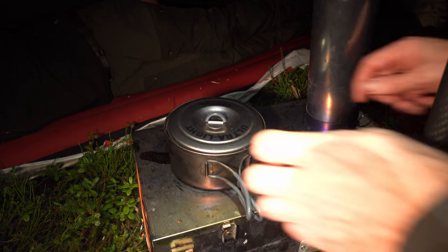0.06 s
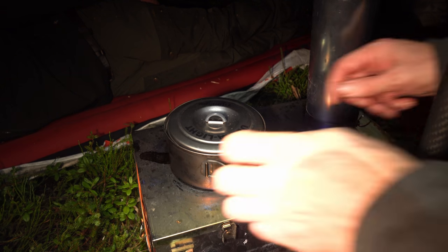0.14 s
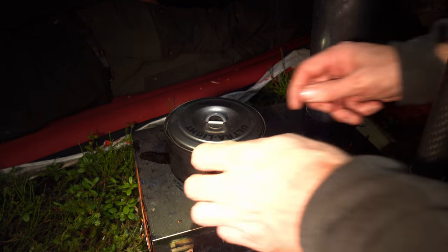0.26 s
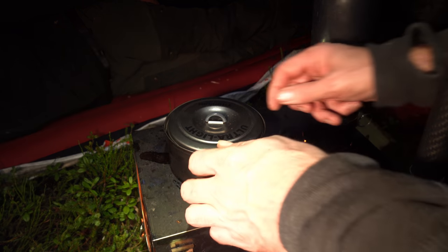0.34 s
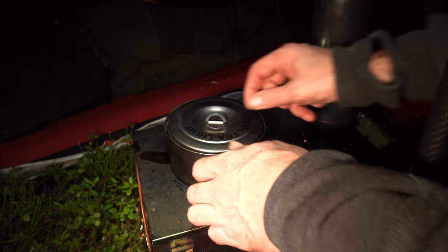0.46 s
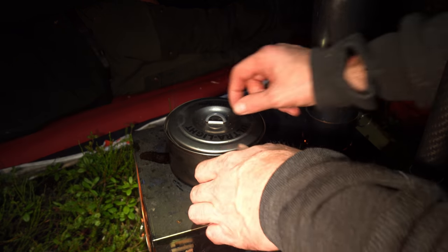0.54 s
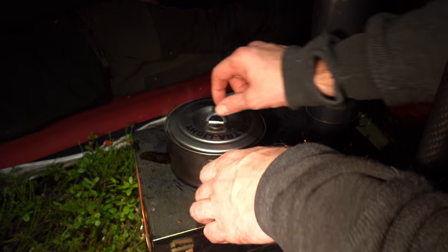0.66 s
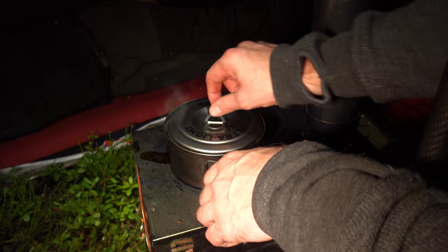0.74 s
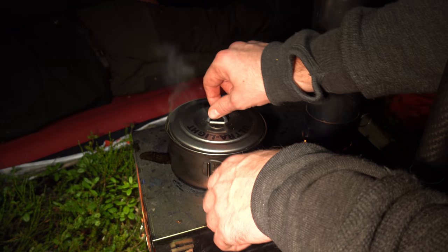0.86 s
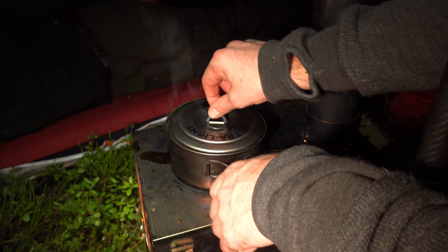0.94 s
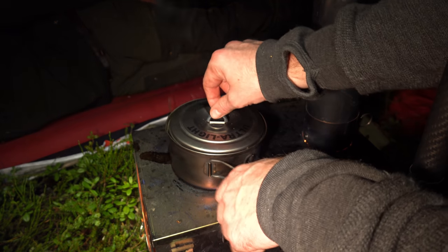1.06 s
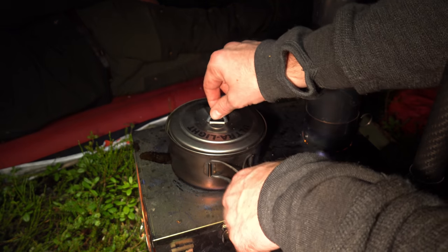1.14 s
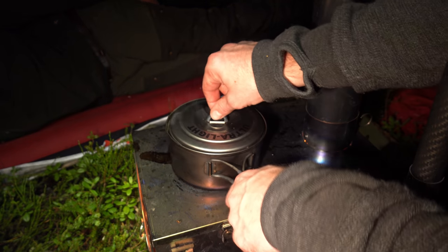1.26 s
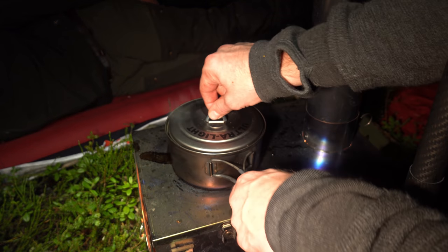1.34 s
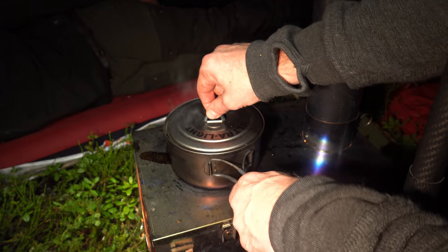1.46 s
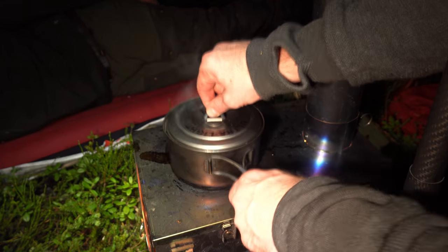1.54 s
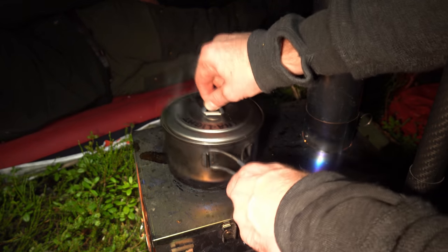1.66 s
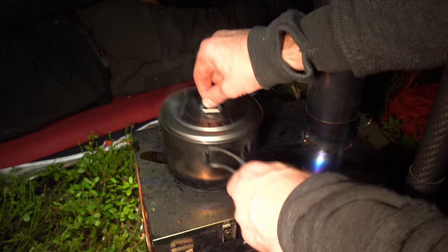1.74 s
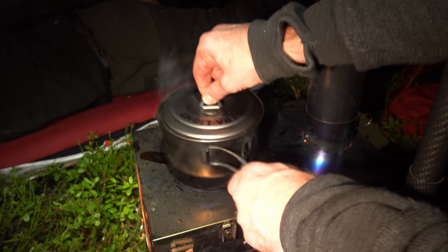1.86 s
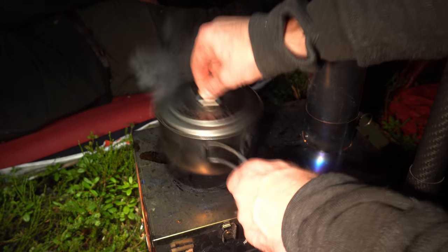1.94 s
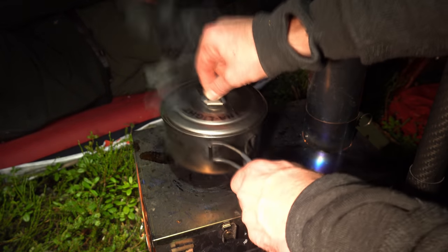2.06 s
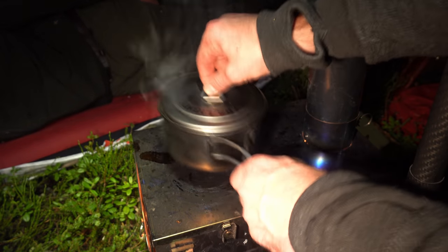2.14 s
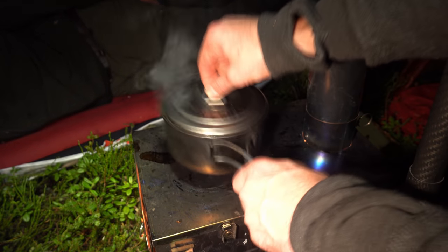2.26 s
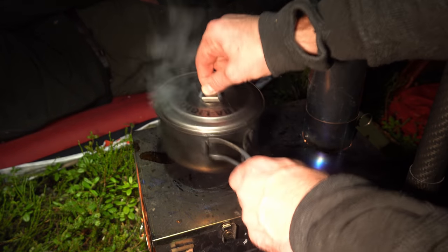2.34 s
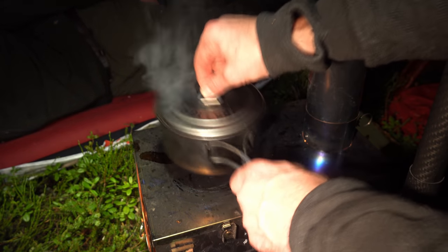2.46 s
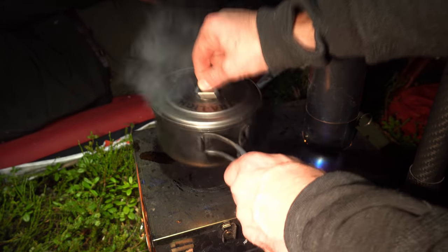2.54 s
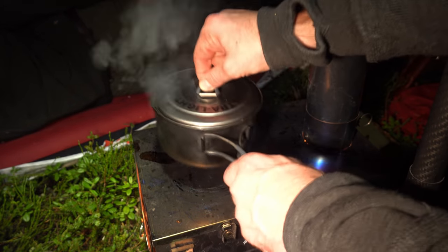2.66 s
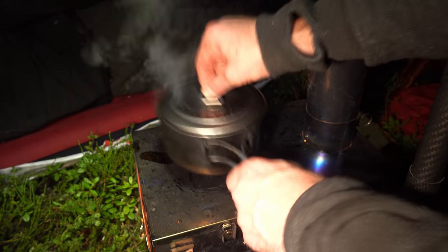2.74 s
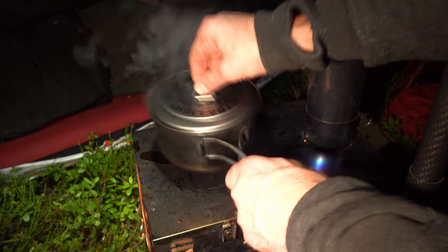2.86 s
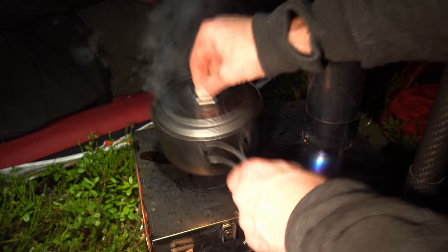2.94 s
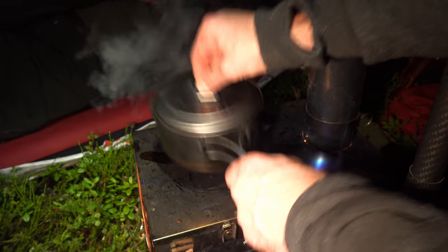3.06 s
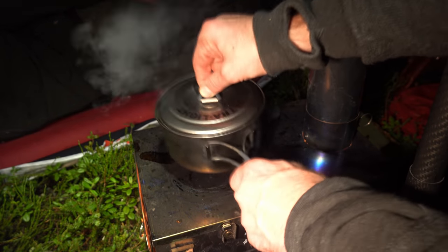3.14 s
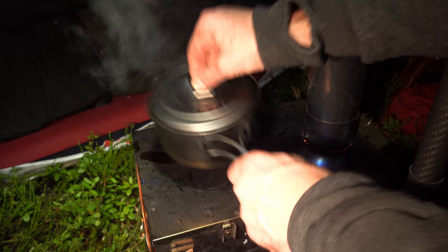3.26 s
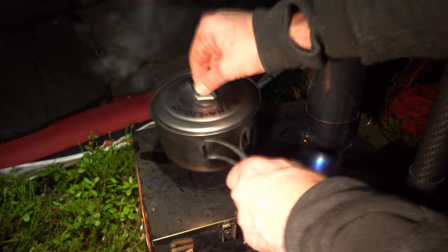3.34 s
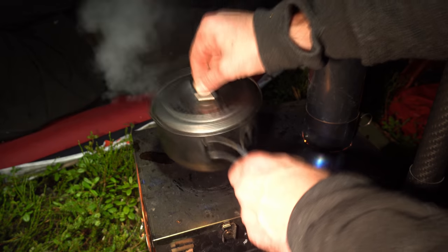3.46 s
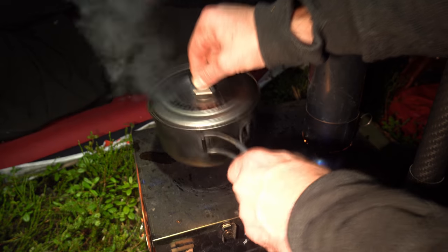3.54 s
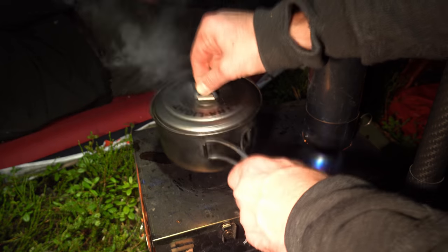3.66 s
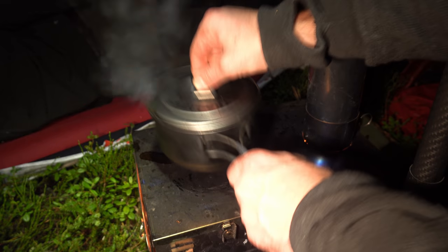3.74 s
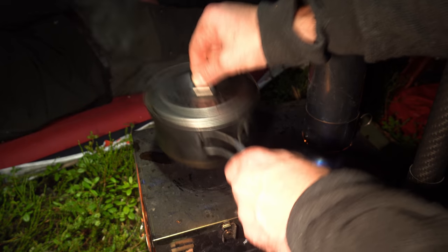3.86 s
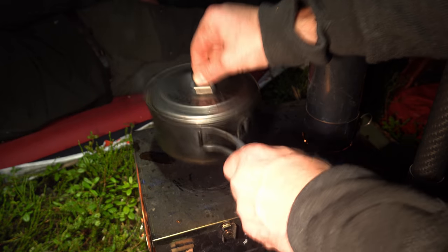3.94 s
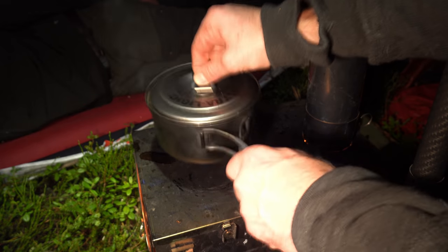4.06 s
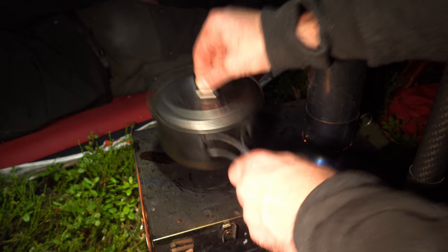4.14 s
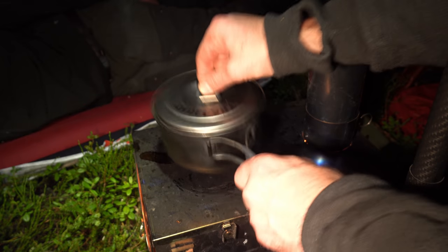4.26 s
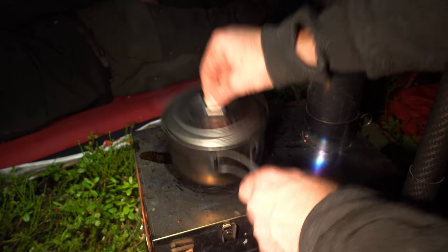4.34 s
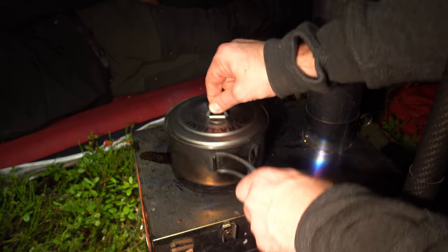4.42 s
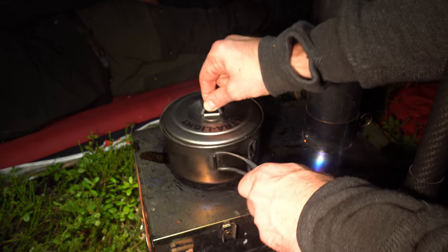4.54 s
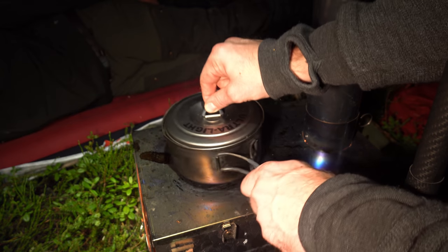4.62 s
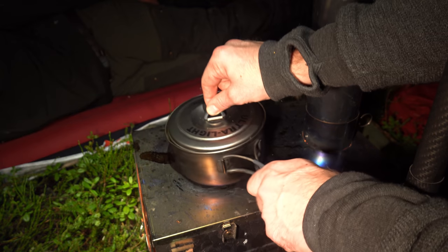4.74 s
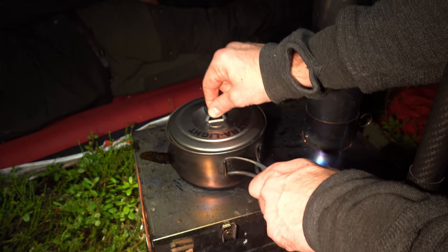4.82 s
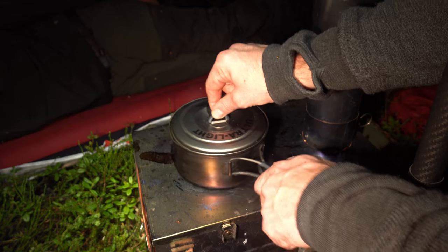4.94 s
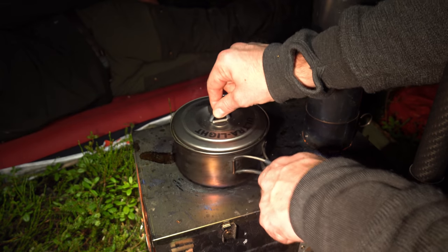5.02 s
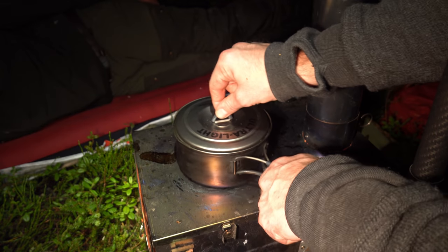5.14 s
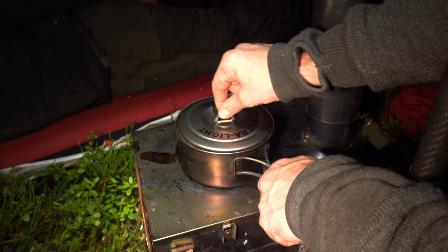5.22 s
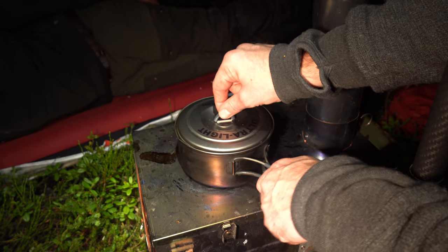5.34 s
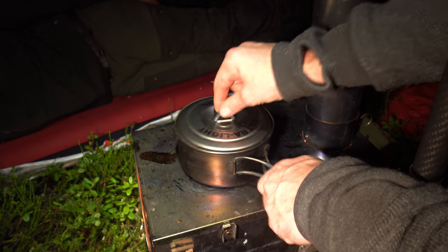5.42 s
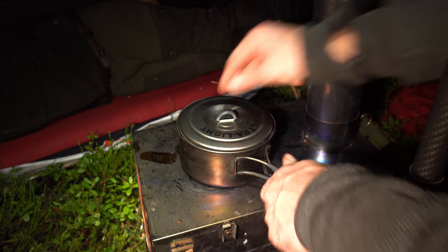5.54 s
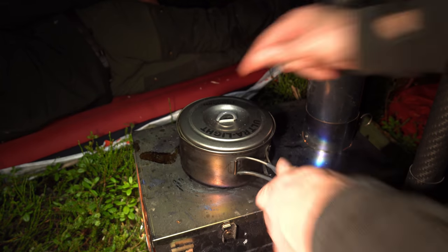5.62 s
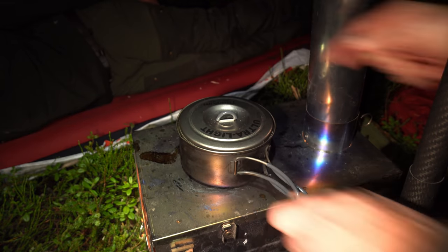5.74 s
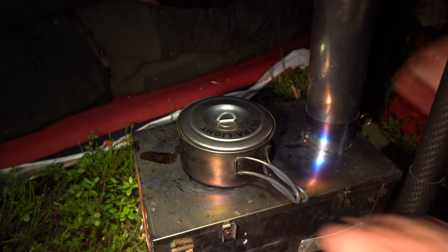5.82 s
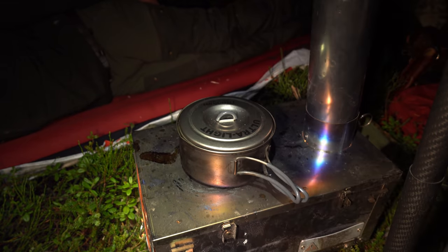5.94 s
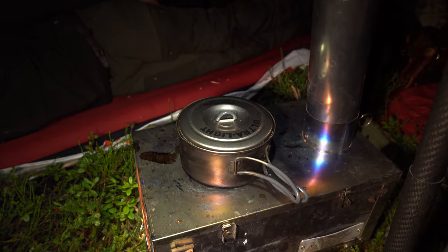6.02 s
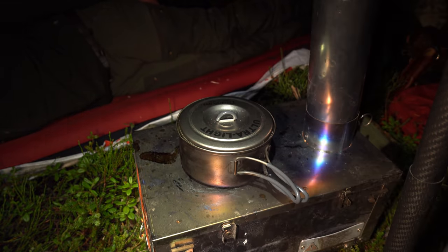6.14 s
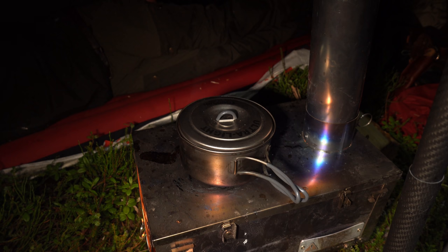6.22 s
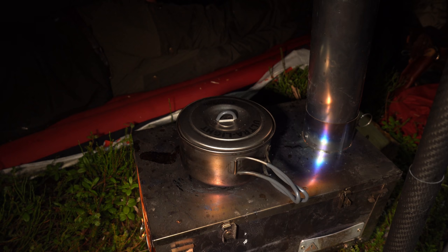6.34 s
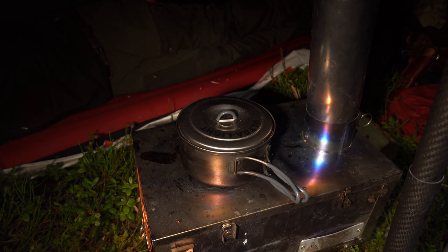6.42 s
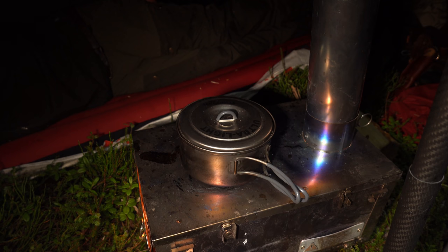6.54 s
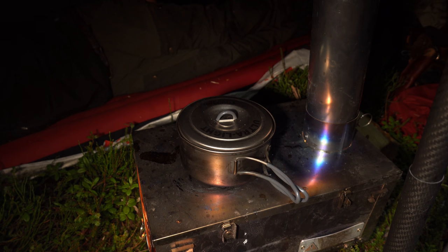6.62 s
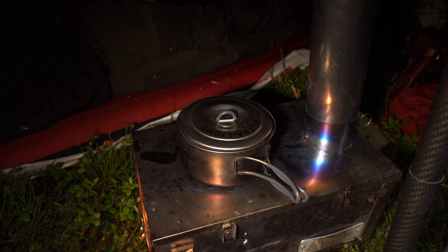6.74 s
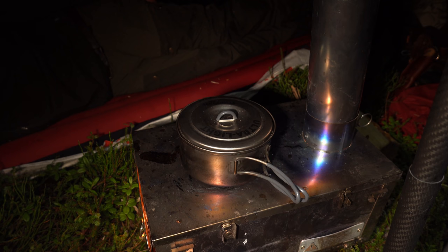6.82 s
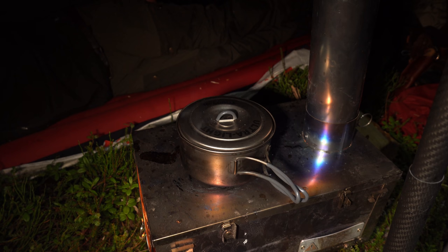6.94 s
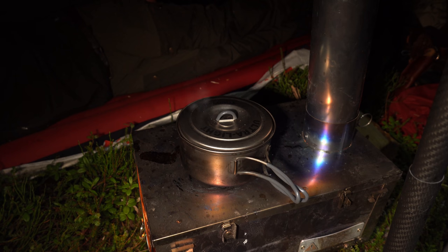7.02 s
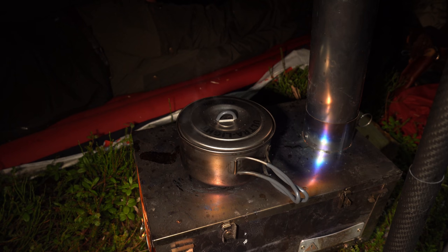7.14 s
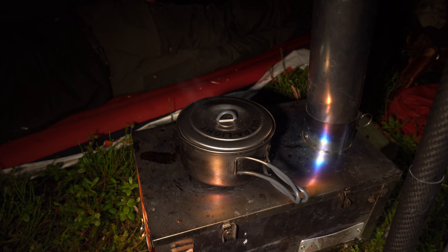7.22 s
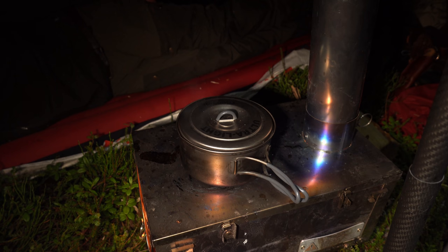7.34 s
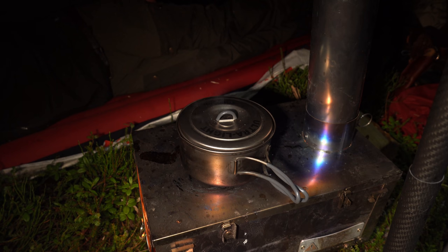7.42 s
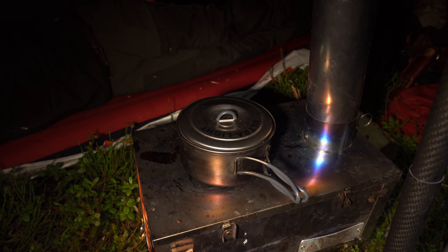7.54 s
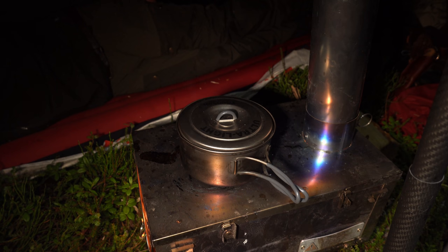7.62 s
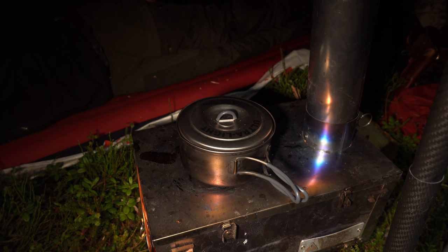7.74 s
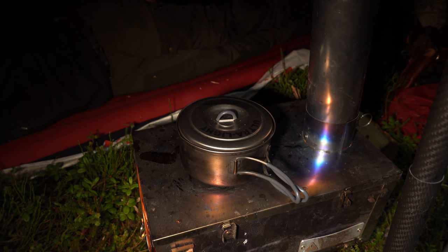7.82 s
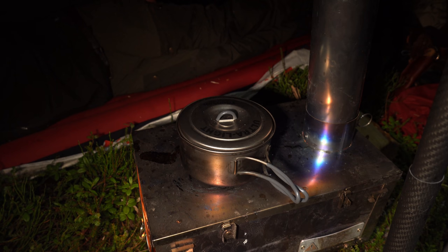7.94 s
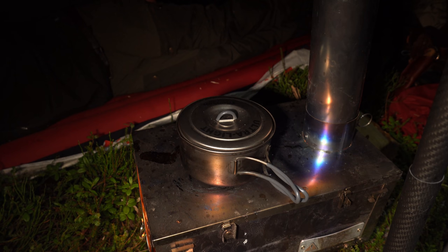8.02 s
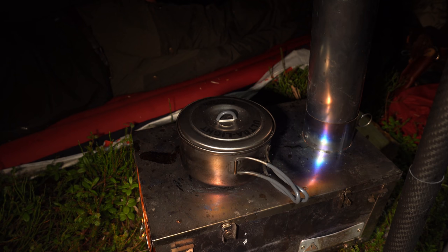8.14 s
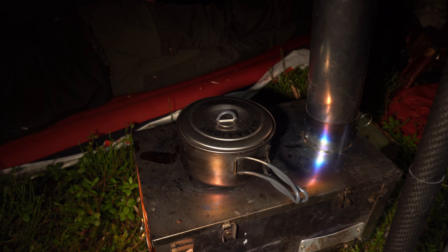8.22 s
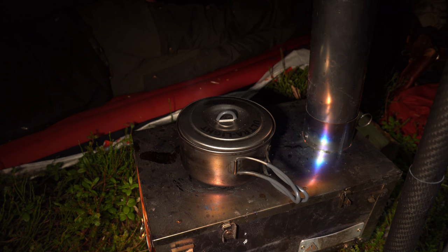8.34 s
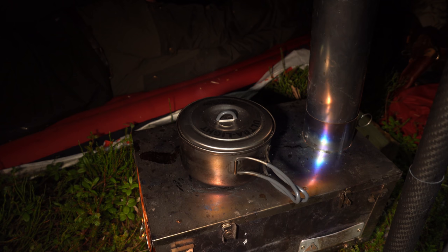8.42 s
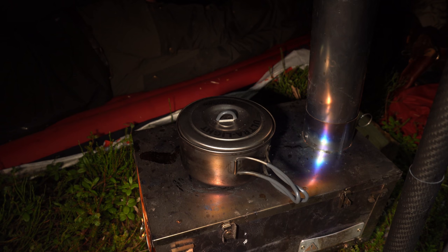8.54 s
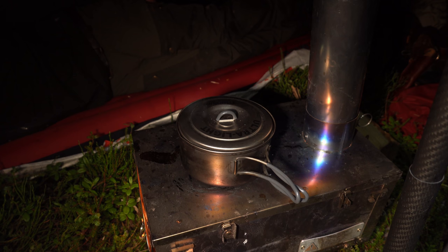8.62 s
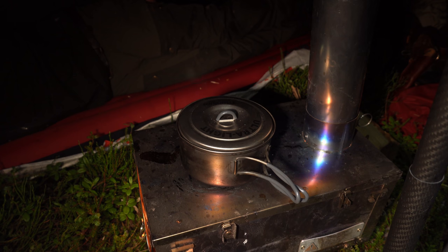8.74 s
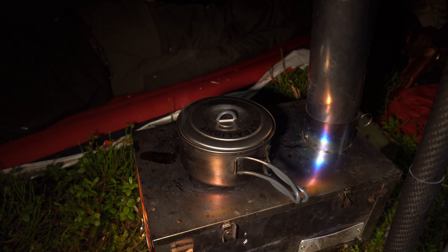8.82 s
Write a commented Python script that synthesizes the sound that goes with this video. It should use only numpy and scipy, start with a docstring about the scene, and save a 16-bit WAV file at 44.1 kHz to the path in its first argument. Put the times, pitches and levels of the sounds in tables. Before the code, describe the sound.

Popcorn pops sharply in a thin lidded metal pot, then fast rattling shaking, then scattered pops again over a soft stove rumble in a tent.

```python
"""A small wood stove rumbles softly in a tent, with faint grit and steam from a thin lidded metal pot.
Popcorn pops in the pot: each pop clicks, cracks, clatters and thumps the shut-in air, among small knocks.
Some blows ring the pot wall. For under three seconds the pot is shaken, throwing the load against base
and lid about nine times a second. Sleeves rustle. Sources are shaped noise, grit and sines;
the cloth walls answer the pot."""
import sys
import numpy as np
from scipy import signal
from scipy.fft import rfft, irfft, next_fast_len
from scipy.io import wavfile
from scipy.ndimage import map_coordinates

SR = 44100
rng = np.random.default_rng(int(sys.argv[2]) if len(sys.argv) > 2 else 0)


def put_to_file(sound):
    """Save the sound as 16-bit audio at rate SR, in the file named by the first command-line argument."""
    columns = np.atleast_2d(sound).T  # one column per channel
    safe = np.clip(columns, -1, 1)
    whole_steps = np.round(safe * 32767)
    wavfile.write(sys.argv[1], SR, whole_steps.astype(np.int16))


N = 391608


def amp(db):
    """Decibels to amplitude."""
    return 10 ** (np.asarray(db) / 20)


def unit(x):
    """Scale to an rms of 1."""
    return x / np.sqrt(np.mean(x ** 2) + 1e-20)


def at(points, s):
    """Read (time, value) points at times s, in straight lines."""
    return np.interp(s, *np.transpose(points))


def along(points, hz):
    """Read (frequency, value) points on a log frequency axis."""
    f, v = np.transpose(points)
    return np.interp(np.log(hz + 1), np.log(f + 1), v)


def wobble(rate):
    """A smooth random curve with rate knots a second."""
    knots = rng.standard_normal(int(N * rate / SR) + 4)
    return map_coordinates(knots, [np.arange(N) * rate / SR])


def filtered(x, response):
    """Filter x by a complex response of frequency."""
    m = next_fast_len(N + SR // 2)
    return irfft(rfft(x, m) * response(np.fft.rfftfreq(m, 1 / SR)), m)[..., :N]


def band(x, lo_hz, hi_hz):
    """Causal band-pass with gain set by bandwidth, to hold white noise near its rms."""
    sos = signal.butter(2, [lo_hz, min(hi_hz, 20000)], "bandpass", fs=SR, output="sos")
    return signal.sosfilt(sos, x) * np.sqrt(SR / 2 / (hi_hz - lo_hz))


def grit(rate, spread_db, life):
    """Tiny contacts at random times and sizes, each a puff of noise dying over life [s]; rms 1."""
    taps = (rng.random(N) < rate / SR) * amp(spread_db * rng.standard_normal(N))
    puffs = signal.lfilter([1], [1, -np.exp(-1 / (life * SR))], taps)
    return unit(puffs * rng.standard_normal(N))


def add(track, s, sound):
    """Mix a sound into a track at time s."""
    part = track[round(s * SR):][:len(sound)]
    part += sound[:len(part)]


# Fire rumble over time: (time [s], level before gusts [dB])
FIRE_LEVEL = [(0.0, -46.5), (1.21, -49.5), (1.61, -46.5), (5.22, -52.5), (7.07, -49), (7.96, -56.5),
              (8.36, -45), (8.88, -56.5)]
# Colour of the rumble: (frequency [Hz], relative level [dB])
RUMBLE_COLOUR = [(18, -19.5), (30, -6.5), (120, -3.5), (137, -8.5), (152, -11.5), (236, -9.5), (450, -26.5),
                 (580, -64), (990, -120)]
# Colour of the steady hiss: (frequency [Hz], relative level [dB])
HISS_COLOUR = [(240, -47.5), (400, -11.5), (1160, -22.5), (1960, -17), (2510, -22), (6640, -19.5),
               (16000, -34.5)]
HISS_DB = -62.5


def stove():
    """The fire's draught rumbles unevenly over a faint steady hiss."""
    rumble = unit(filtered(rng.standard_normal(N), lambda hz: amp(along(RUMBLE_COLOUR, hz))))
    hiss = unit(filtered(rng.standard_normal(N), lambda hz: amp(along(HISS_COLOUR, hz))))
    gusts = amp(2.5 * wobble(6))
    return amp(at(FIRE_LEVEL, np.arange(N) / SR)) * gusts * rumble + amp(HISS_DB) * hiss


# Faint grit of the hot load: (time [s], level [dB])
SIZZLE_LEVEL = [(0, -57.5), (1.7, -57), (4.57, -78), (4.8, -68), (5.1, -57), (6.7, -67.5), (7.6, -65),
                (8., -86), (8.4, -49), (8.88, -60)]
SETTLE_DB, SETTLE_RISE_S, SETTLE_T60_S = -32, 0.027, 0.37  # level is re the crack or crash
STEAM_DB = -68.5


def settling():
    """The load sizzles, steam hisses, and flakes tumble to rest after each pop and the last throw."""
    level, t = amp(at(SIZZLE_LEVEL, np.arange(N) / SR)), np.arange(SR) / SR
    for s, db, *_ in POP_EVENTS + THROW_EVENTS[-1:]:
        decay = amp(db + SETTLE_DB - 60 * t / SETTLE_T60_S)
        add(level, s, decay * (1 - np.exp(-t / SETTLE_RISE_S)))
    flakes = band(level * grit(400, 3, .004), 190, 2930)
    steam = band(amp(STEAM_DB) * rng.standard_normal(N), 3200, 13000)
    return flakes + steam


# Pot damped by the hands: (resonance [Hz], width [Hz], level [dB])
HELD_POT_MODES = [(700, 110, -3.5), (1236.6, 31, 8), (1936, 124, 5.5), (2897, 490, 6.5), (4320, 180, -1.5),
                  (5110, 83, 8.5), (5670, 66, -8.5), (8150, 89, 8.5), (8630, 47, -22)]


def pot(x, broad_db):
    """Colour x with the held pot's resonances over a broad response, levelled at 500-3000 Hz."""
    def response(f):
        h = amp(broad_db)
        for k, (centre, width, db) in enumerate(HELD_POT_MODES):
            damping = 1j * f * width
            # alternate modes swing in opposite phase
            h = h + (-1) ** k * amp(db) * damping / (centre * centre - f * f + damping)
        return h / np.sqrt(np.mean(abs(h[(f > 500) & (f < 3000)]) ** 2))
    return filtered(x, response)


# Pops: (time [s], crack level [dB], thump level [dB], thump pitch [Hz],
#        brightness [dB re crack], base clatter t60 [s])
POP_EVENTS = [(0.131, -26, -38, 308, 1.5, 0.13), (0.175, -13, -42.5, 322, -5.5, 0.28),
              (0.218, -25, -40.5, 316, -1, 0.2), (0.649, -10.5, -25.5, 311, -4.5, 0.23),
              (0.84, -6.5, -41.5, 326, -14, .084), (1.183, -23.5, -40, 309, 5, 0.039),
              (1.315, -12, -30.5, 310, -4, 0.086), (1.348, -28, -38, 307, 2, 0.19),
              (1.472, -9, -32.5, 327, -0.5, .18), (4.86, -12.5, -25, 337, -1, 0.054),
              (5.474, -25, -36.5, 425, -9.5, .27), (6.2, -13, -38, 310, -13.5, 0.45),
              (6.22, -21, -38, 383, 8, .1), (6.257, -27, -39, 313, -18, 0.052),
              (6.298, -12, -39.5, 312, -11, 0.18), (6.689, -19, -24, 326, 12.5, .067),
              (6.801, -20, -52, 332, -9, 0.025), (6.884, -21, -37, 347, 4.5, 0.16),
              (7.114, -8, -27, 335, -6, 0.11), (7.238, -4.5, -24, 393, -3.5, 0.22),
              (8.253, -8.5, -34, 400, -1, .14), (8.285, -18, -32, 251, -24, 0.16),
              (8.328, -2.5, -25.5, 320, -5.5, .15), (8.538, -11.5, -32, 327, 4.5, 0.061),
              (8.722, -7.5, -26.5, 343, -12.5, .12)]
# Small hits and knocks in and on the pot: (time [s], crack level [dB], brightness [dB re crack])
SMALL_HITS = [(0.196, -22, 8), (0.257, -27, 2), (0.288, -29, -16), (0.331, -27.5, -14), (0.399, -38, 15.5),
              (0.678, -3.5, -1), (0.708, -24, 14), (0.741, -25.5, 16), (0.817, -19.5, -2),
              (0.92, -24.5, -15), (4.507, -28.5, -17), (4.656, -37, -18), (4.74, -38.5, -13),
              (4.834, -32.5, -20), (4.871, -18, 2.5), (4.918, -20, -5), (4.943, -31.5, 7), (4.96, -20, -30),
              (5.072, -47, -8), (5.103, -52, -8), (5.159, -47, 10), (5.425, -38.5, -2), (5.498, -30, -9),
              (6.276, -13, -5.5), (6.289, -23, -8), (6.345, -28, -22), (6.407, -25.5, -28),
              (6.423, -41, -57), (6.448, -59, -20), (6.756, -34, -14), (6.776, -35, -9), (6.813, -26, 2),
              (6.913, -23.5, -1), (7.154, -21.5, -22), (7.286, -14, 7.5), (7.387, -17.5, -12),
              (7.409, -30.5, 8.5), (7.45, -22.5, -28), (7.488, -27.5, -32), (7.636, -33, -12),
              (7.65, -34, -1), (8.084, -51, -20), (8.165, -51, -20), (8.359, -35, 19.5),
              (8.456, -25.5, -24), (8.501, -35, -6), (8.595, -35.5, 6), (8.618, -27.5, 4.5),
              (8.754, -26, 3.5), (8.785, -24, -7), (8.835, -19.5, -14)]
HIT_T60_S = 0.14  # base clatter time of a small hit
HIT_THUMP_DB, THUMP_GROWS = -39.5, 0.47  # thump, and its dB gained per dB of crack
AIR_HZ, AIR_SCATTER = 312, 0.11  # thump pitch of a small hit, and its largest fractional change
# top band re crack, and its dB gained per dB of brightness
POP_TREBLE_DB, HIT_TREBLE_DB, TREBLE_GROWS = -12, -17.5, 1.3
CLICK_DB, SNAP_T60_S = 9, 0.022  # first hard contact re its band level; the burst that follows


def pops():
    """Pops and small hits: click, snap, ragged clatter whose treble dies first, and a thump of the air."""
    clicks, snaps, tails, air = np.zeros((3, N)), np.zeros((3, N)), np.zeros((4, N)), np.zeros(N)
    t = np.arange(SR // 4) / SR
    blows = [(*pop, POP_TREBLE_DB) for pop in POP_EVENTS]
    for s, db, bright_db in SMALL_HITS:
        hz = AIR_HZ * (1 + AIR_SCATTER * rng.uniform(-0.81, 1))
        thump_db = HIT_THUMP_DB + THUMP_GROWS * db
        blows.append((s, db, thump_db, hz, bright_db, HIT_T60_S, HIT_TREBLE_DB))

    for s, db, thump_db, hz, bright_db, t60, treble_db in blows:
        # low, mid and high bands
        levels = [db, db + bright_db, db + treble_db + TREBLE_GROWS * bright_db]
        tail_levels = levels + [thump_db + 17.5]  # the fourth tail is a dull knock
        for k, (level, slower) in enumerate(zip(tail_levels, [1.02, 0.74, 0.35, 1.68])):
            add(tails[k], s, amp(level - 17.5 - 60 * t / (slower * t60)))
        for k, level in enumerate(levels):
            add(snaps[k], s, amp(level - 9.5 - 60 * t / SNAP_T60_S))
            add(clicks[k], s, amp([level + CLICK_DB]))
        thump = amp(thump_db + 16 - 60 * t / 0.058) * (1 - np.exp(-t / 0.00064))
        add(air, s, thump * np.sin(2 * np.pi * hz * t))

    clatter = grit(900, 3.5, .002)
    low, mid, high = clicks + snaps * rng.standard_normal((3, N)) + tails[:3] * clatter
    top = band(high, 8500, 15000)
    knock = band(tails[3] * rng.standard_normal(N), 147, 466)
    return pot(band(low, 1040, 3200), 3.9) + band(mid, 1800, 8270) + top + knock + air


# Blows that ring the wall: (time [s], place, level [dB], share of the free ring time)
RING_EVENTS = [(0.175, "rim", -12.5, 1), (0.178, "lid", -25, 1.1), (0.679, "lid", -28, 1.1),
               (0.681, "rim", -22, 0.76), (0.705, "rim", -13, 0.64), (1.349, "base", -40.5, 0.55),
               (1.489, "side", -27.5, 0.61), (4.872, "side", -22.5, 0.53), (4.876, "base", -35, 0.92),
               (5.497, "lid", -49, 0.68), (6.198, "lid", -32, 1.4), (6.911, "side", -21.5, 0.87),
               (7.286, "side", -12.5, 1.02)]
# Groups of wall modes excited together: (frequency [Hz], level [dB], free t60 [s])
WALL_MODES = [
    [(2285, 0, .16)],
    [(2428, 0, .36)],
    [(2524, 0, .3)],
    [(2953, 0, 1.1)],
    [(3818, 0, .4)],
    [(4192, 0, .11), (5916, -10, .08), (8129, -10, .08)],
    [(4893, -6, .26), (5631, -6, .18), (6040, -11, .4), (6611, 0, .2), (7305, -8, .26), (10300, -22, .3)],
]
# How a blow at each place stirs the wall: (level of each mode group [dB])
PLACE_LEVELS = {"side": (0.5, -1, -5, -22.5, -15, -17.5, -15), "base": (0, 4, -12, 0, -17, 7, -3),
                "rim": (-26, -24, -15.5, -52, -52, -0.5, -42), "lid": (-18, -18, -0.5, -33, -20, -33, -26)}


def wall():
    """Wall modes ring after a hard blow, adding to any swing; the ring times vary but for the longest."""
    out, t = np.zeros(N), np.arange(SR) / SR
    for s, place, level_db, share in RING_EVENTS:
        clock = round(s * SR) / SR + t  # one clock keeps repeated blows in phase
        ring = np.zeros(len(t))
        for group_db, modes in zip(PLACE_LEVELS[place], WALL_MODES):
            for hz, db, t60 in modes:
                ring_s = t60 if t60 > 1 else share * t60
                decay = amp(level_db + group_db + db - 60 * t / ring_s)
                ring += decay * np.sin(2 * np.pi * hz * clock)
        add(out, s, ring * (1 - np.exp(-t / 0.00058)))
    return out


# Load landing on the base: (first kernel [s], crash level [dB], thump [dB re crash], thump pitch [Hz])
THROW_EVENTS = [(1.659, -17.5, -19, 294), (1.75, -22.5, -21, 266), (1.862, -10, -21, 375),
                (1.972, -4.5, -17.5, 295), (2.078, -5.5, -16.5, 299), (2.184, -4, -17, 300),
                (2.29, -5, -18, 302), (2.397, -6.5, -20.5, 317), (2.504, -7, -19.5, 356),
                (2.62, -6, -17.5, 330), (2.734, -6, -17, 304), (2.844, -7, -16, 342), (2.938, -7, -22, 306),
                (3.05, -8.5, -17, 325), (3.17, -5.5, -14, 270), (3.268, -5, -21, 309),
                (3.367, -5.5, -16, 345), (3.481, -7, -8, 301), (3.577, -8.5, -23, 358),
                (3.684, -6, -18.5, 353), (3.803, -8.5, -13, 298), (3.899, -9.5, -9, 333),
                (4.037, -6.5, -17, 337), (4.143, -5.5, -18, 395), (4.259, -5, -14.5, 335),
                (4.376, -9, -18, 304)]
# Load rattling on the lid: (time [s], level [dB])
LID_EVENTS = [(1.8136, -35.5), (1.854, -16.5), (1.9444, -12.5), (2.053, -13), (2.158, -12), (2.2637, -12.5),
              (2.371, -13), (2.478, -13), (2.5747, -14), (2.6964, -12), (2.817, -11.5), (2.9218, -17.5),
              (3.0021, -18), (3.1273, -16.5), (3.223, -11.5), (3.325, -13.5), (3.428, -13.5),
              (3.533, -16.5), (3.639, -16.5), (3.7518, -15), (3.868, -22.5), (3.989, -18), (4.106, -17.5),
              (4.2104, -14.5), (4.312, -16)]
# Landing time scale, a third of the time to the swarm's peak: (time [s], spread [s])
LANDING_SPREAD = [(1.7, .011), (2., .0078), (2.9, 0.0067), (3.8, 0.0062), (3.9, 0.0098), (4.26, 0.005),
                  (4.38, 0.0097)]
# Treble of the crash: (time [s], level [dB re crash])
CRASH_TREBLE = [(1.85, -19), (2., -13.5), (3.1, -10.5), (4.27, -9.5), (4.39, -19)]
# Air modes above the flying load: (frequency ratio, relative level [dB])
WHOOP_MODES = [(1, 0), (1.45, -6), (2.85, -4)]
# Pitch the lowest air mode glides up to, shifting as the load loosens: (time [s], frequency [Hz])
WHOOP_PITCH = [(1.7, 670), (2.4, 709), (3.1, 740.5), (3.6, 793), (4.4, 770)]
WHOOP_DB, TUMBLE_DB = -30, -35.5  # air modes and low tumbling, re crash
ROLL_DB, ROLL_T60_S = -20.5, 0.37  # stragglers that keep rolling, re the treble swarm
RATTLE_T60_S = 0.16


def shaking():
    """Each throw lands as a swarm of kernels; then the load flies up and rattles on the lid."""
    low, high, lid, tumble, air = np.zeros((5, N))
    t = np.arange(SR // 6) / SR
    for s, db, thump_db, hz in THROW_EVENTS:
        u = t / at(LANDING_SPREAD, s) / 3
        swarm = (u * np.exp(1 - u)) ** 3
        rolling = amp(ROLL_DB - 60 * t / ROLL_T60_S) * np.minimum(u, 1)
        add(low, s, amp(db - 8.5) * swarm)
        add(high, s + 0.002, amp(db + at(CRASH_TREBLE, s) - 7) * (swarm + rolling))
        bend = 2.95 * np.sin(60 * t + 6 * rng.random())
        thump = np.sin(2 * np.pi * hz * t + bend)
        add(air, s + 0.00604, amp(db + thump_db + 2.5) * swarm ** 2 * thump)

        # every landing stirs two modes of the base at new strengths
        for mode_hz, width_hz, _ in HELD_POT_MODES[1:3]:
            detune, strength, phase = rng.standard_normal(size=3)
            tone = np.sin(2 * np.pi * (mode_hz + 0.584 * width_hz * detune) * t + phase)
            add(air, s + 0.00407, amp(db - 24.0 + 3 * strength) * swarm * tone)
        if s == THROW_EVENTS[-1][0]:
            break  # after the last landing the load stays down

        # as the load leaves the base the air modes glide up, roughened by the tumbling
        turns = np.cumsum(at(WHOOP_PITCH, s) * (1 - .25 * np.exp(-t / .025))) / SR
        flight = np.sin(np.pi * np.clip(t / .08, 0, 1)) ** .4
        add(tumble, s + 0.022, amp(db + TUMBLE_DB) * np.sin(np.pi * np.clip(t / 0.15, 0, 1)))
        for ratio, mode_db in WHOOP_MODES:
            knots = np.minimum(62, t * 50 * ratio ** 2)
            rows = np.array([[0], [1]]) + 0 * t
            drift = .45 * map_coordinates(rng.standard_normal((2, 64)), [rows, [knots] * 2])
            angle = 2 * np.pi * ratio * turns
            tone = (1 / ratio + drift[0]) * np.sin(angle) + drift[1] * np.cos(angle)
            add(air, s + .038, amp(db + WHOOP_DB + mode_db) * flight * tone)

    for s, db in LID_EVENTS:
        decay = amp(db - 5.5 - 60 * t / RATTLE_T60_S) * (1 - np.exp(-t / 0.0025))
        add(lid, s, decay * np.clip((.085 - t) / 0.017, 0, 1))
    kernels = grit(3000, 2.5, .001)
    crash_treble = high * kernels
    rattle = lid * grit(1200, 3.5, .0015)
    body = band(low * kernels, 250, 3120) + 1.74 * band(crash_treble, 2060, 8340)
    body += 0.22 * band(rattle, 600, 2600)
    top = band(0.14 * crash_treble, 4800, 13800)
    bright = band(band(rattle, 3600, 9000), 2500, 28000)
    lid_tone = band(rattle, 4120, 4250)
    tumbling = band(tumble * grit(550, 3, 0.0029), 220, 410)
    return pot(body, 1) + top + 0.72 * bright + .3 * lid_tone + tumbling + air


# Brushing cloth: (time [s], half length [s], centre [Hz], level [dB])
SLEEVE_BRUSHES = [(5.23, .05, 1800, -49), (3.1, 0.059, 6400, -54), (5.59, .035, 4600, -56.5),
                  (5.79, 0.092, 5900, -59)]


def sleeves():
    """Cloth brushes past: faint swells of fine band-passed grit."""
    t, out = np.arange(N) / SR, np.zeros(N)
    for s, half, hz, db in SLEEVE_BRUSHES:
        swell = amp(db) * np.exp(-((t - s) / half) ** 2)
        out += band(swell * grit(2000, 2.5, 0.0013), hz * 0.14, hz * 1.56)
    return out


def tent(x):
    """The cloth walls give a short dull answer: a decaying noise tail, slightly delayed."""
    t = np.arange(SR // 5) / SR
    tail = band(rng.standard_normal(len(t)) * amp(-60 * t / .12), 200, 6000)
    return signal.fftconvolve(np.pad(x, (200, 0)), tail / np.linalg.norm(tail))[:N]


def scene():
    """Mix stove, pot and sleeves, with the tent answering the struck and shaken pot."""
    struck, shaken = pops() + wall(), shaking()
    answer = tent(amp(-15.5) * struck + amp(-18.5) * shaken)
    return (struck + shaken + answer + settling() + sleeves() + stove())[None]


# Overall tone: (frequency [Hz], level [dB])
OVERALL_TONE = [(20, 7.5), (9000, -2), (13000, 2.5), (15700, -1.5), (16200, -31), (17000, -34.5)]
TOP_HZ = 17038  # nothing sounds from here up


def record(dry):
    """The overall tone stays bright to about 15.7 kHz, then drops steeply to nothing."""
    return filtered(dry, lambda hz: amp(along(OVERALL_TONE, hz)) * (hz < TOP_HZ))


dry = scene()
out = record(dry)
put_to_file(out)
```